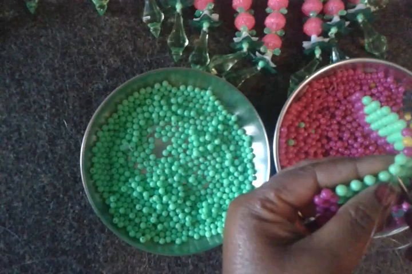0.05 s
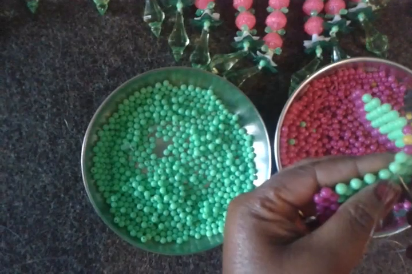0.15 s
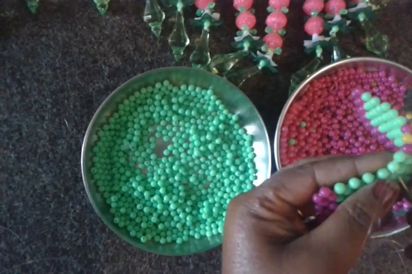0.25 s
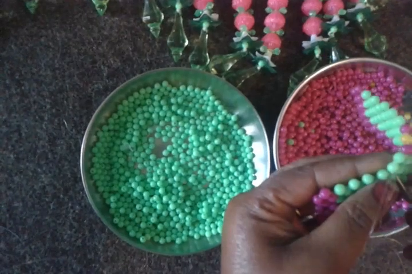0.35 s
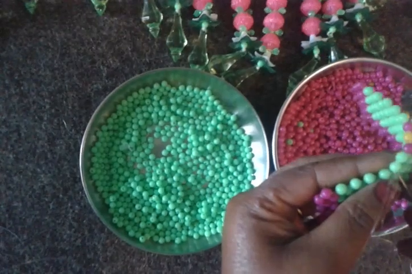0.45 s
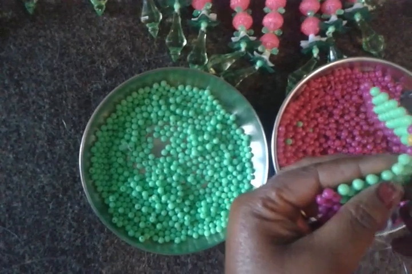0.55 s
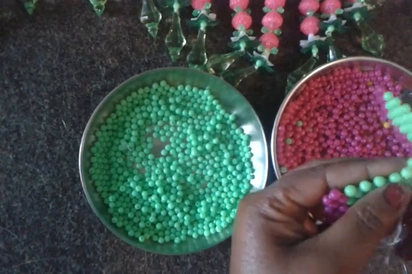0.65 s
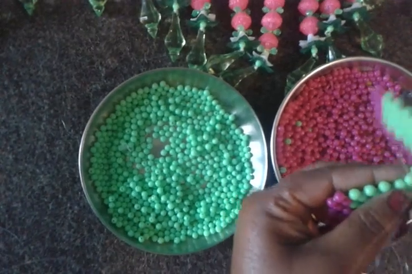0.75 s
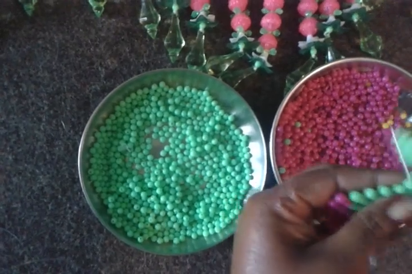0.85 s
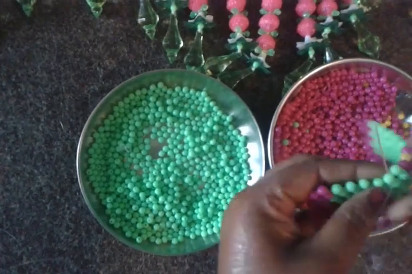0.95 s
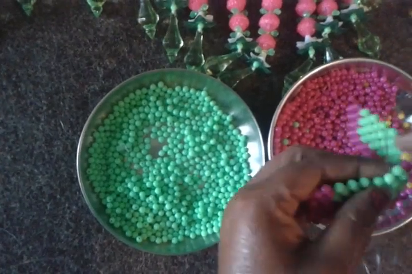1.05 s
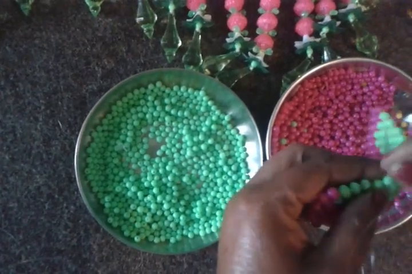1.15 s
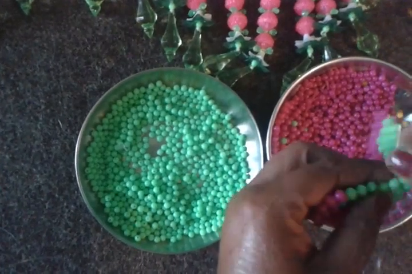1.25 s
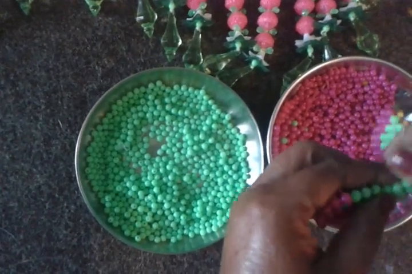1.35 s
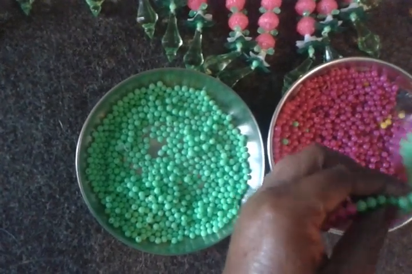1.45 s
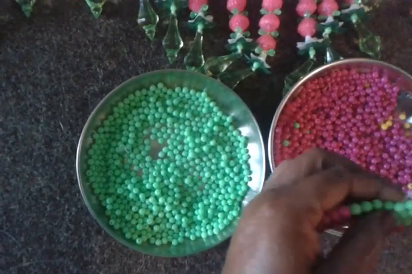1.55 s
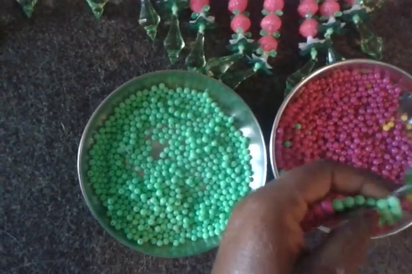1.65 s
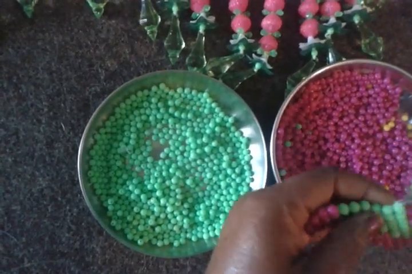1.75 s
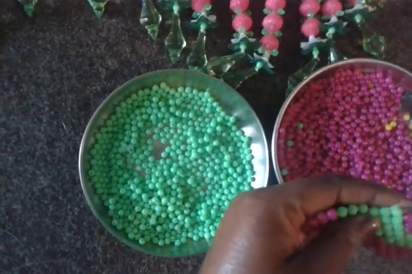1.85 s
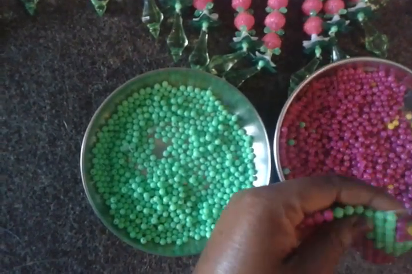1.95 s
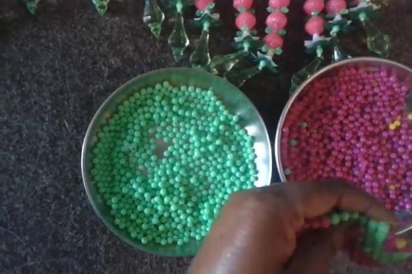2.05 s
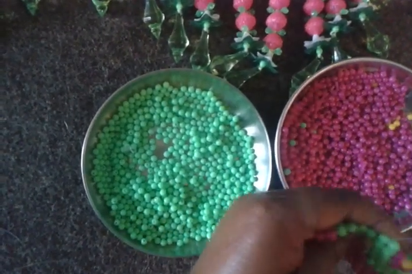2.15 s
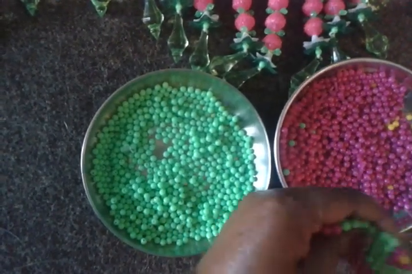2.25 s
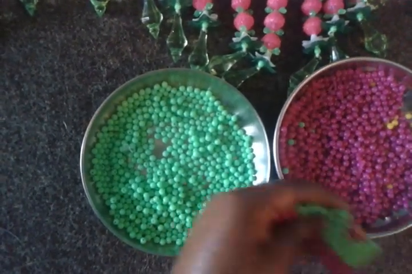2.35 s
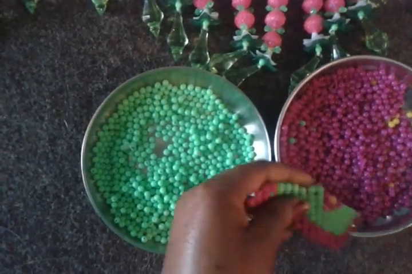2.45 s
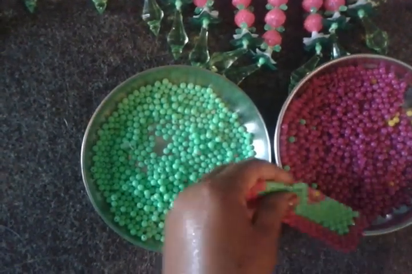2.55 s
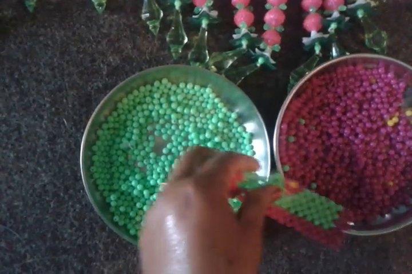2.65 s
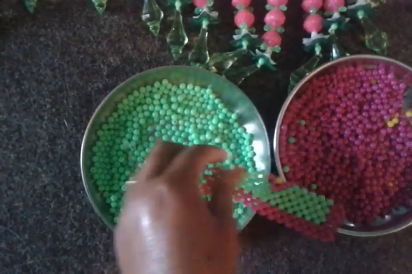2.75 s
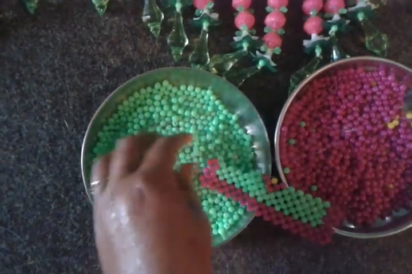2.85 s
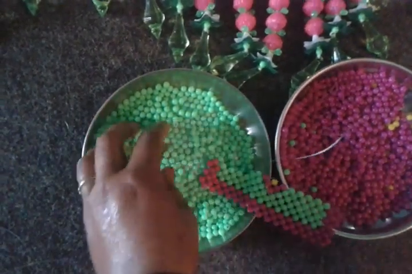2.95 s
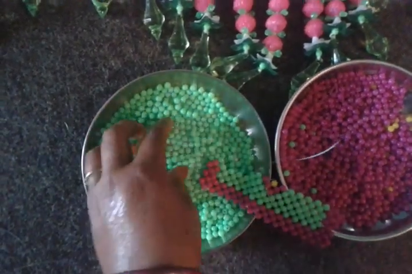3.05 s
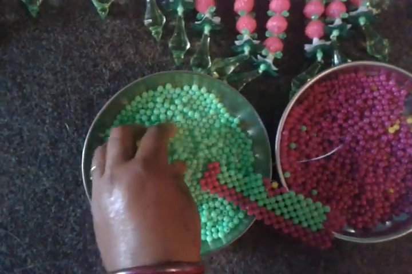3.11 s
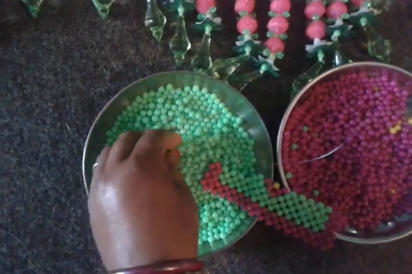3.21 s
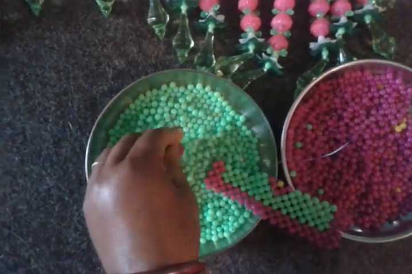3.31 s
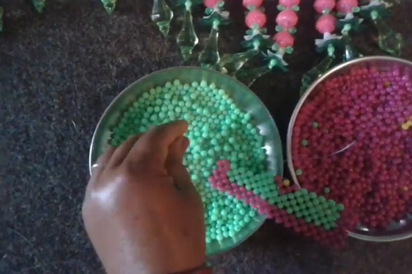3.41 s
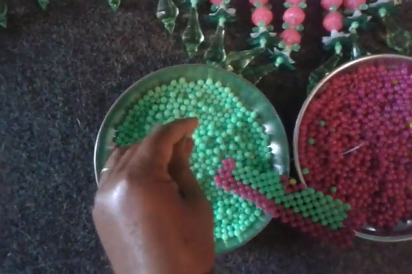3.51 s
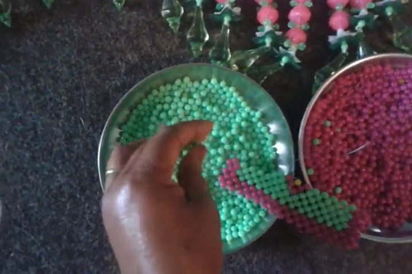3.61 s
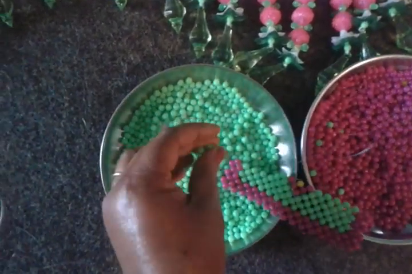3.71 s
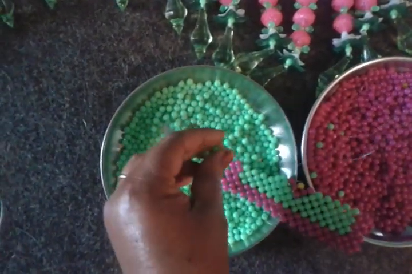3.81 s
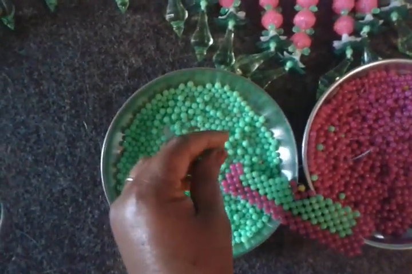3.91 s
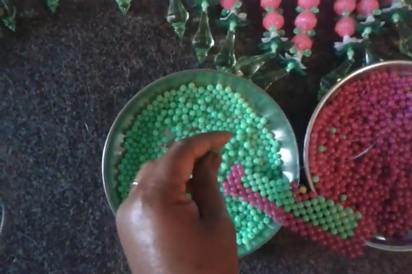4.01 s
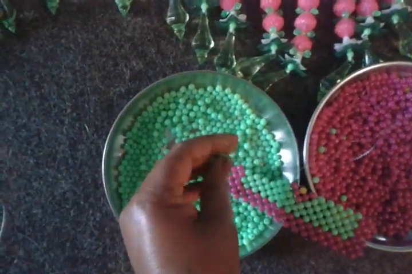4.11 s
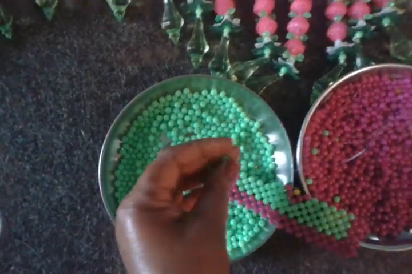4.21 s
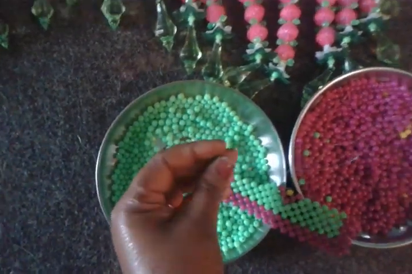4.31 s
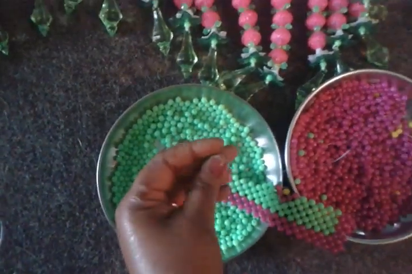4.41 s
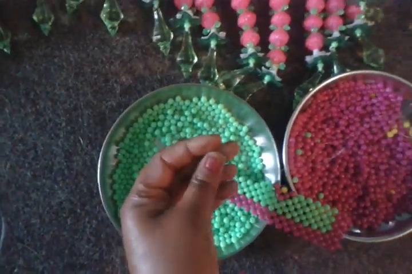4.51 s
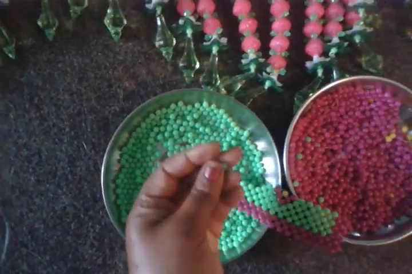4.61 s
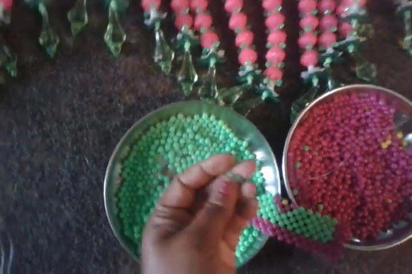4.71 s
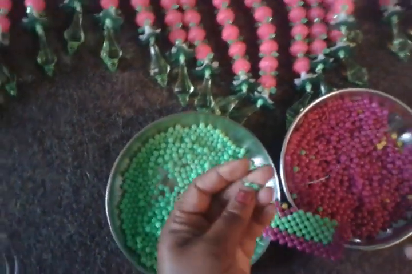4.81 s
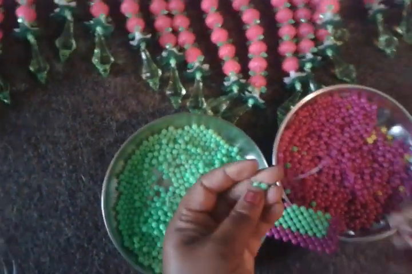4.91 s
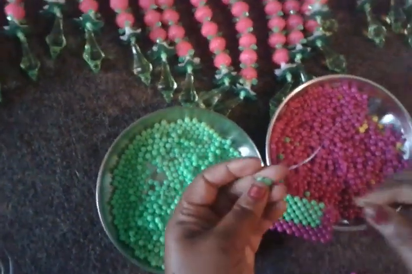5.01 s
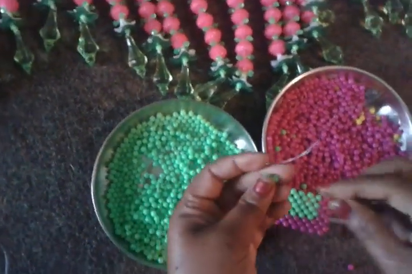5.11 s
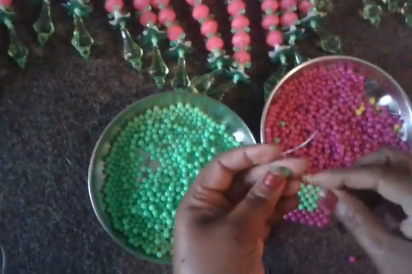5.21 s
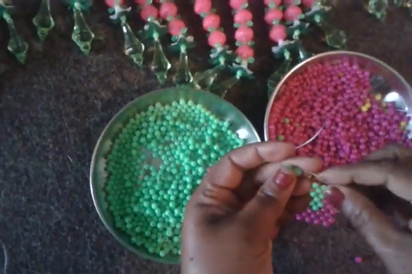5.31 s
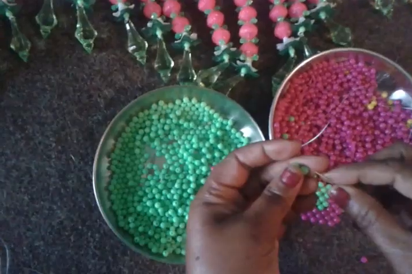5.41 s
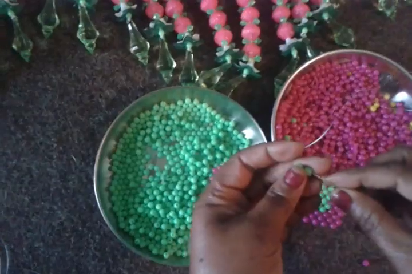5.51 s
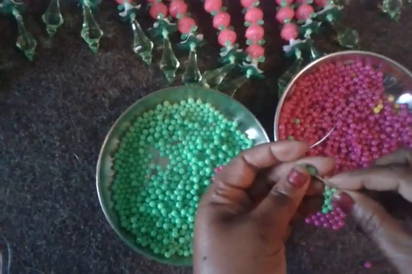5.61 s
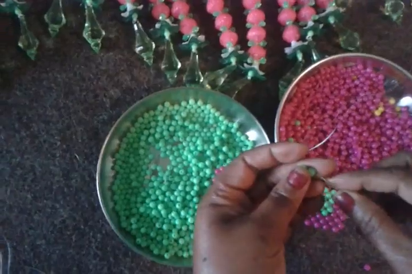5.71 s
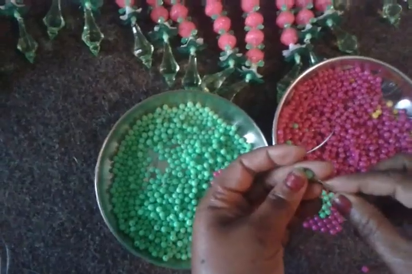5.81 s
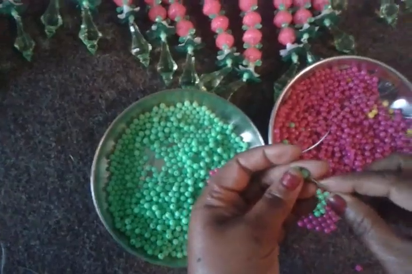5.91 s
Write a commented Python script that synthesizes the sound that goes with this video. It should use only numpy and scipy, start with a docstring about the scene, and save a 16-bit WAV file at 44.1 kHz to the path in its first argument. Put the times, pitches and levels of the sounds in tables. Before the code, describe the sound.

Close-up beadwork in a quiet room: sparse ticks and bangle chinks, a bright burst of bead rattle, then short nylon hisses and snaps.

```python
"""Beadwork at a table in a quiet room, close to the microphone, over steady room air and the rustle of moving arms.
Glass bangles chink on the wrist, on and off, and small plastic beads tick as the piece is handled.
Then fingers dig into a steel bowl full of beads: knocking cracks and bowl ring over a dense rattle of collisions.
At the end a nylon thread hisses and hums through the beads, snaps free and rasps in short tugs.
Ticks and rubs are shaped noise, rings are decaying sines, and a small room answers all but the background."""
import sys
import numpy as np
from scipy import signal
from scipy.fft import rfft, irfft, next_fast_len
from scipy.io import wavfile
from scipy.ndimage import map_coordinates

SR = 44100
rng = np.random.default_rng(int(sys.argv[2]) if len(sys.argv) > 2 else 0)


def master(y):
    """Save y as 16-bit WAV."""
    cut = np.clip(np.atleast_2d(y).T, -1, 1)
    pcm = np.round(cut * 32767)  # scale
    wavfile.write(sys.argv[1], SR, pcm.astype(np.int16))


N = 262836
TIME = np.arange(N) / SR  # the whole scene [s]
RING = np.arange(SR // 4) / SR  # time axis of one short sound [s]

# bead contacts: (time [s], level before a common trim [dB], low hollow knock [dB re the crack],
# top-end sparkle [dB re the crack])
CLICKS = [(0.411,-39.5,-25,-13), (1.198,-33.5,-14.5,-26), (2.176,-31,-12,-5), (2.5424,-17.5,-22.5,-12),
          (2.5909,-30,-33,-20), (2.614,-24,-22,-28), (2.763,-31.5,-37,-19), (2.7742,-33.5,-28,-30),
          (2.9025,-15,-13.5,-9.5), (2.9083,-11,-13.5,-12.5), (2.9107,-9.5,-15.5,-8.5), (2.9897,-30,-11,-9),
          (3.045,-17,-35,-9), (3.0612,-14,-38,-6.5), (3.0788,-12,-38,-18), (3.094,-17,-33,-7),
          (3.1115,-22,-32,-19), (3.3316,-18.5,-11,-4.5), (3.35,-20,-11,-10), (3.3623,-22.5,-26,-17),
          (3.4103,-17,-16,-8.5), (3.4394,-28,-8,-7), (3.4542,-16.5,-16,-10.5), (3.501,-21,-16,-11),
          (3.5373,-18.5,-16,-10.5), (3.55,-25,-13,-25), (3.6334,-13.5,-6.5,-30), (3.635,-11,-13,-9.5),
          (3.7509,-15,-6.5,-4.5), (3.769,-24,-28,-25), (3.7871,-20.5,-17.5,-15), (3.8397,-33,-23,-19),
          (3.9125,-33.5,-21,-11), (3.944,-43.5,-29,-13), (3.955,-40,-28,-14), (3.983,-42.5,-28,-20.5),
          (4.3217,-47.5,-35,-18.5)]
# spectrum of a bead's crack: (frequency [Hz], relative level [dB])
BEAD_SPECTRUM = [(1500, -29), (2600, -12.5), (3700, -9), (4700, 3), (6000, -2.5), (7700, -4.5),
                 (9500, -11.5), (11000, -49)]
# top-end sparkle of a hard contact: (frequency [Hz], relative level [dB])
SPARKLE_SPECTRUM = [(8000, -47), (10000, 14), (11200, 4.5), (12800, 13), (14000, 0), (15500, -44.5)]
# many loose beads colliding: (frequency [Hz], relative level [dB])
HEAP_SPECTRUM = [(350, -33.5), (600, -16), (1300, -10), (2400, -7), (3400, -5), (4700, 4), (5800, 3),
                 (8000, 1), (10500, -8.5), (13300, -11.5), (14600, -41.5)]
# nylon sliding in bead holes: (frequency [Hz], relative level [dB])
THREAD_SPECTRUM = [(300, -20.5), (2000, -23.5), (3200, -14), (4600, -2.5), (5500, -7), (7000, -12.5),
                   (9000, -15), (13000, -23.5), (14200, -36)]


def amp(db):
    """Decibels to gain."""
    return 10 ** (np.asarray(db) / 20)


def unit(x):
    """Scale to rms 1."""
    return x / np.sqrt(np.mean(x ** 2) + 1e-20)


def along(points, hz):
    """(Hz, value) points read on a log frequency axis."""
    f, v = np.transpose(points)
    return np.interp(np.log(hz + 1), np.log(f + 1), v)


def filtered(x, gain):
    """x through a gain that depends on frequency."""
    padded = next_fast_len(len(x) + 4096)
    spectrum = rfft(x, padded) * gain(np.fft.rfftfreq(padded, 1 / SR))
    return irfft(spectrum, padded)[:len(x)]


def coloured(x, spectrum):
    """x shaped by the given spectrum, fading to nothing below its first point, at rms 1."""
    lowest_hz = spectrum[0][0]
    return unit(filtered(x, lambda hz: amp(along(spectrum, hz)) * np.minimum(hz / lowest_hz, 1)))


def noise(spectrum, size=N):
    """Coloured noise of rms 1."""
    return coloured(rng.standard_normal(size), spectrum)


def gains(rows, edge=.004):
    """One gain per sample for each dB column, silent outside the rows but for short edges [s]."""
    s, *cols = np.transpose(rows)
    gate = np.clip(np.minimum(TIME - s[0], s[-1] - TIME) / edge + 1, 0, 1)
    return [gate * amp(np.interp(TIME, s, c)) for c in cols]


def wobble(rate):
    """A random curve read at TIME * rate / SR knots, far less than one knot over the scene, so it stays almost
    constant."""
    knots = rng.standard_normal(int(N * rate / SR) + 4)
    return map_coordinates(knots, [TIME * rate / SR])


def add(track, s, sound):
    """Mix a sound into the track at time s."""
    part = track[max(round(s * SR), 0):][:len(sound)]
    part += sound[:len(part)]


def burst(spectrum, t60, swell=0):
    """Decaying noise, like a dense cluster of damped modes struck once; as strong as its envelope."""
    shape = amp(-60 * RING / max(t60, .001)) * (1 - np.exp(-RING / (swell + .0001)))
    x = noise(spectrum, size=len(RING)) * shape
    return x * np.linalg.norm(shape) / np.linalg.norm(x)


def impacts(rate, spread_db):
    """Randomly timed impulses of log-normal size, either sign, rate a second on average."""
    size = amp(spread_db * np.clip(rng.standard_normal(N), -2, 2))
    return (rng.random(N) < rate / SR) * size * rng.choice([-1, 1], N)


def background():
    """Steady noise of room air, with the wavering rumble and rustle of moving arms and stray bead ticks."""
    # hands, cloth and arms: (time [s], rumble [dB], rustle before its lift [dB])
    handling = [(0.0, -76, -81.5), (0.83, -79.5, -78.5), (1.14, -70, -71.5), (1.29, -73, -76.5),
                (2.46, -70.5, -76), (2.95, -67, -66), (3.09, -63.5, -54), (3.25, -63.5, -57),
                (3.65, -71.5, -58.5), (3.8, -65, -68.5), (4.21, -81.5, -80.5), (4.68, -73.5, -78),
                (4.8, -77.5, -79), (5.28, -75.5, -75.5), (5.46, -68.5, -66.5), (5.61, -68, -64),
                (5.78, -65, -77), (5.96, -69, -74)]
    # low rumble of the arms: (frequency [Hz], relative level [dB])
    rumble_spectrum = [(35, -23), (58, -1.5), (85, -0.5), (125, -1.5), (200, -7), (320, -14), (600, -27),
                       (1200, -77)]
    # rustle of hands and cloth: (frequency [Hz], relative level [dB])
    rustle_spectrum = [(120, -14.5), (300, -10.5), (550, 0), (1300, -2.5), (3000, -6), (4900, 1.5),
                       (7000, -10.5), (13500, -9), (14500, -53.5)]
    # room air: (frequency [Hz], relative level [dB])
    air_spectrum = [(60, -1), (130, 4.5), (220, -13), (310, -2.5), (450, -5), (1000, -20), (3000, -19.5),
                    (4900, -30.5), (7000, -29), (13700, -22.5), (14600, -42.5)]
    rustle_lift_db, stray_db = 5.5, -15  # both re the rustle column
    air_db = -76

    rumble, rustle = gains(handling)
    rumble_sway = amp(2.5 * wobble(9))
    rustle_sway = amp(rustle_lift_db + 4.8 * wobble(12))
    arms = rumble_sway * rumble * noise(rumble_spectrum) + rustle_sway * rustle * noise(rustle_spectrum)
    contacts = signal.fftconvolve(impacts(rate=9, spread_db=3), amp(-60 * RING / .008))[:N]
    stray = amp(stray_db) * rustle * coloured(contacts * rng.standard_normal(N), HEAP_SPECTRUM)
    return arms + stray + amp(air_db) * noise(air_spectrum)


def bangles():
    """Glass rings touch: a sharp tick, then the bending modes ring on over a shimmer of lighter contacts."""
    # bangle contacts: (time [s], tick level before a common trim [dB], ring [dB],
    # brightness of the ring [dB per octave])
    chinks = [(0.1366,-35.5,-64.5,2), (1.54,-48,-63.5,7), (1.692,-43.5,-65,-4.5), (1.7474,-18.5,-45,-4),
              (2.0342,-32.5,-51,5.5), (2.3567,-29.5,-55.5,0), (2.371,-45,-52.5,1), (4.1469,-35.5,-57.5,5),
              (4.5395,-25.5,-56.5,2.5), (4.7013,-27,-45.5,5), (4.7159,-23,-51,-8), (4.9357,-34,-56,0),
              (4.9594,-40,-58,2)]
    # bending modes of the larger bangle, with a neighbouring bangle ringing along at 2125 Hz (and perhaps 5800
    # Hz): (frequency [Hz], relative level [dB], 60 dB decay [s])
    glass_modes = [(2125, -12, .17), (2556, 0, .25), (5170, -3, .094), (5800, -7, .12), (7315, 6, .13),
                   (13865, -1, .09)]
    # when the smaller bangle is the one struck: (from [s], to [s])
    small_bangle = [(1.5, 1.6), (2.3, 2.4)]
    # lighter contacts: (frequency [Hz], relative level [dB])
    shimmer_spectrum = [(2000, -11), (3500, -4), (4700, 5), (5900, 6.5), (6600, -28), (13000, -8)]
    small_pitch = 1.043  # ratio to the larger bangle
    pivot_hz = 5500  # brightness tilts the ring about this frequency

    out = np.zeros(N)
    for s, tick_db, ring_db, tilt_db in chinks:
        pitch = small_pitch if any(a < s < b for a, b in small_bangle) else 1
        tick = burst(BEAD_SPECTRUM, t60=0.011) + amp(-13.5) * burst(SPARKLE_SPECTRUM, t60=0.028)
        shimmer = amp(-15.5) * burst(shimmer_spectrum, t60=0.24)
        add(out, s, amp(tick_db - 6.0) * (tick + shimmer))
        for hz, db, t60 in glass_modes:
            strength_db = ring_db + db + tilt_db * np.log2(hz / pivot_hz)
            phase = 2 * np.pi * (pitch * hz * RING + rng.random())
            # a ring is never quite round, so each mode has a close twin that beats with it
            twin = .35 * np.sin(phase * rng.uniform(1.003, 1.01))
            add(out, s, amp(strength_db - 60 * RING / t60) * (np.sin(phase) + twin))
    return out


def clicks():
    """A bead cracks against its neighbours over a low hollow knock and settling; in the bowl its steel rings."""
    # modes of the bead-loaded bowl: (frequency [Hz], relative level [dB])
    bowl_modes = [(4380, -6.5), (4594, -0.5), (4797, 15.5), (5000, -19), (5600, -0.5), (5924, -6),
                  (6850, -10), (7240, 12.5), (7700, 13.5)]
    # low hollow knock under the crack: (frequency [Hz], relative level [dB])
    knock_spectrum = [(400, -24), (620, -6), (800, 2), (1100, 1), (1400, -1), (2100, -7), (3200, -20)]
    # while the fingers are in the bowl; outside it the held beadwork clicks without ring: (from [s], to [s])
    in_bowl = (2.8, 4.0)
    bowl_db, bowl_t60_s = -28, .065  # ring re the crack, and its 60 dB decay

    out = np.zeros(N)
    mode_hz, mode_db = np.transpose(bowl_modes)[:, :, None]
    for s, db, knock_db, sparkle_db in CLICKS:
        crack = burst(BEAD_SPECTRUM, t60=.014)
        strengths = amp(mode_db + 1 * rng.standard_normal(mode_db.shape))  # each spot rings differently
        phases = 2 * np.pi * (mode_hz * RING + rng.random(mode_hz.shape))
        modes = np.sum(strengths * np.sin(phases), axis=0)
        ring = (in_bowl[0] < s < in_bowl[1]) * amp(bowl_db - 60 * RING / bowl_t60_s) * modes
        sparkle = amp(sparkle_db) * burst(SPARKLE_SPECTRUM, t60=0.028)
        hollow = burst(knock_spectrum, t60=0.015)
        hollow += amp(-26.0) * burst(knock_spectrum, t60=0.45, swell=0.027)
        settle = amp(-28.5) * burst(BEAD_SPECTRUM, t60=0.17, swell=0.00284)
        add(out, s, amp(db - 5) * (crack + ring + sparkle + amp(knock_db) * hollow + settle))
    return filtered(out, lambda hz: 1 - 1 / (1 + (hz / 480) ** 6))  # small beads carry no bass


def stirring():
    """Fingers push through the heap, thousands of tiny collisions a second; hard clicks set more tumbling."""
    # fingers digging in the bowl: (time [s], rattle level [dB])
    dig = [(3.02, -65), (3.05, -31.5), (3.17, -36), (3.238, -24), (3.364, -31), (3.386, -49), (3.406, -35),
           (3.548, -57), (3.6, -101)]
    collisions_per_s, collision_spread_db, collision_t60_s = 2400, 3.7, .008
    # rattle after a click listed at 0 dB, its dB per dB of click, and its 60 dB decay
    spill_db, spill_grows, spill_t60_s = -21, 1.64, 0.34

    collisions = impacts(collisions_per_s, collision_spread_db)
    flicker = signal.fftconvolve(collisions ** 2, amp(-60 * RING / collision_t60_s) ** 2)[:N]
    rattle = coloured(np.sqrt(np.abs(flicker)) * rng.standard_normal(N), HEAP_SPECTRUM)
    power = gains(dig)[0] ** 2  # powers add, as the collisions are unrelated
    for s, db, knock_db, sparkle_db in CLICKS:
        add(power, s, amp(spill_db + spill_grows * db - 60 * TIME[:SR] / spill_t60_s) ** 2)
    return np.sqrt(power) * rattle


def snaps():
    """The caught thread slips free: one heavily damped swing and a tiny bead tick."""
    # slips: (time [s], level before a common lift [dB], pitch [Hz], tick [dB re the swing])
    slips = [(4.3672, -38.5, 2260, -6), (4.436, -34.5, 1365, -8), (5.2816, -27.5, 463, -6),
             (5.502, -8.5, 1170, -13), (5.6497, -9.5, 343, -11), (5.9367, -39.5, 1680, -5)]
    swing_t60_s = 0.0017

    out = np.zeros(N)
    for s, db, hz, tick_db in slips:
        envelope = amp(-60 * RING / swing_t60_s) * (1 - np.exp(-RING / .00005))
        swing = np.cos(2 * np.pi * hz * RING) * envelope
        tick = amp(tick_db) * burst(THREAD_SPECTRUM, t60=0.0042)
        add(out, s, amp(db + 6.5) * (swing + tick))
    soft = signal.sosfilt(signal.butter(4, 5200, fs=SR, output='sos'), out)
    return signal.sosfilt(signal.butter(2, 110, 'highpass', fs=SR, output='sos'), soft)


def thread():
    """Nylon slides through the bead holes with a hiss; as tension builds in a stroke the beadwork hums along."""
    # strokes: (start [s], attack [s], length [s], hiss [dB], swell [dB per s], starting hum [dB re the hiss])
    strokes = [(4.466, .025, 0.06, -51, 15, -38), (5.2402, 0.0012, 0.056, -44, 178, -31),
               (5.337, 0.015, 0.059, -46, -220, -40), (5.424, 0.068, 0.226, -38, -47.5, -17),
               (5.704, .01, 0.052, -51.5, -180, -4.5)]
    # hum of the taut beadwork: (frequency [Hz], relative level [dB])
    taut_spectrum = [(100, -22), (400, -3.5), (1000, 8.5), (1700, 4), (2500, -4.5), (3300, -11), (4000, 7),
                     (4700, -22.5), (8000, -38)]
    release_t60_s, tension_db_per_s = 0.064, 88  # a stroke dying away, growth of the hum re the hiss

    hiss, hum, t = np.zeros(N), np.zeros(N), TIME[:SR // 2]
    for s, attack_s, length, db, swell_db, hum_db in strokes:
        pulled = np.minimum(t, length)  # time spent pulling so far
        attack = np.minimum(t / attack_s, 1)
        stroke = attack * amp(db + swell_db * pulled - 60 * (t - pulled) / release_t60_s)
        add(hiss, s, stroke)
        add(hum, s, stroke * amp(hum_db + tension_db_per_s * pulled))
    grip = amp(1.4 * wobble(220))  # a random level for the friction, nearly steady through the scene
    return grip * (hiss * noise(THREAD_SPECTRUM) + hum * noise(taut_spectrum))


def tugs():
    """A short hard pull makes the thread stick and slip: a brief rasp of shaped noise."""
    # pulls: (time [s], level [dB], length [s], brightness [dB per octave])
    pulls = [(5.691, -30.5, 0.016, -2.5), (5.892, -26, 0.007, 2.5), (5.9, -32.5, 0.0096, 1)]
    # rasp before its brightness tilt: (frequency [Hz], relative level [dB])
    rasp_spectrum = [(100, -20), (300, -10.5), (710, -9), (1450, -7.5), (2300, -6), (3600, -5), (4500, 0.5),
                     (6000, -11), (8700, -21.5), (14000, -38)]

    out = np.zeros(N)
    for s, db, length, tilt_db in pulls:
        shape = (1 - np.exp(-RING / 0.0027)) * amp(-60 * np.maximum(RING - length, 0) / 0.027)
        tilted = [(hz, level + tilt_db * np.log2(hz)) for hz, level in rasp_spectrum]
        add(out, s, amp(db) * shape * noise(tilted, size=len(RING)))
    return out


def room(x):
    """A small room answers with a tail of noise that decays at its own pace in each band."""
    # reverberation: (frequency [Hz], 60 dB decay [s])
    decay = [(200, .28), (1000, .26), (5000, .33), (13000, .2)]
    # colour of the tail: (frequency [Hz], relative level [dB])
    colour = [(200, 3.5), (900, 1), (2500, 1.5), (5000, -8.5), (8000, -35), (13000, 3)]

    hz, t, z = signal.stft(rng.standard_normal(SR // 2), SR, nperseg=256)
    fade = amp(along(colour, hz)[:, None] - 60 * t / along(decay, hz)[:, None])
    tail = signal.istft(z * fade, SR, nperseg=256)[1]
    tail[:SR // 300] = 0  # the first reflection arrives a few milliseconds late
    return signal.fftconvolve(x, tail / np.linalg.norm(tail))[:N]


def scene():
    """All sources on one close microphone, with the room behind them."""
    air_and_arms = background()
    glass = bangles()
    beads = clicks() + stirring()
    nylon = snaps() + thread() + tugs()
    wet = room(amp(-13) * beads + amp(-23.5) * glass + amp(-30.0) * nylon)
    return (beads + glass + nylon + wet + air_and_arms)[None]


def record(dry):
    """The recorder drops the deepest bass and cuts steeply above its band limit."""
    top_hz = 14400
    lean = signal.sosfilt(signal.butter(3, 45, 'highpass', fs=SR, output='sos'), dry)
    return np.array([filtered(x, lambda hz: 1 / np.sqrt(1 + (hz / top_hz) ** 120)) for x in lean])


dry = scene()
out = record(dry)
master(out)
```